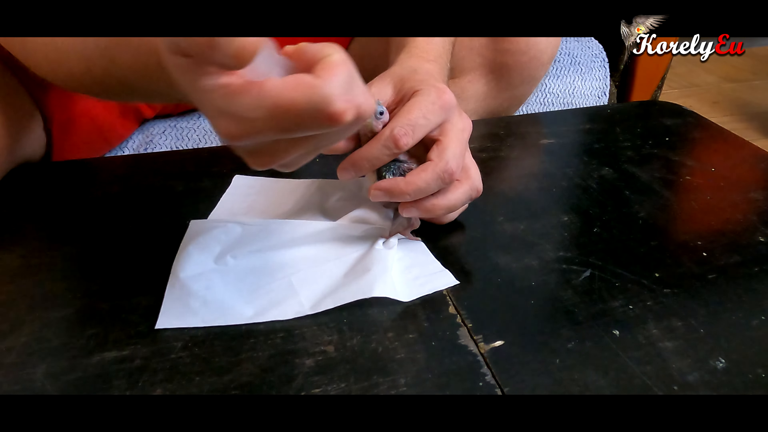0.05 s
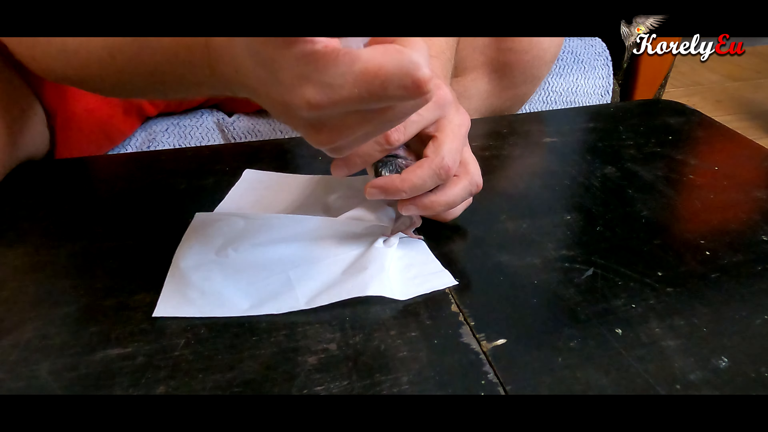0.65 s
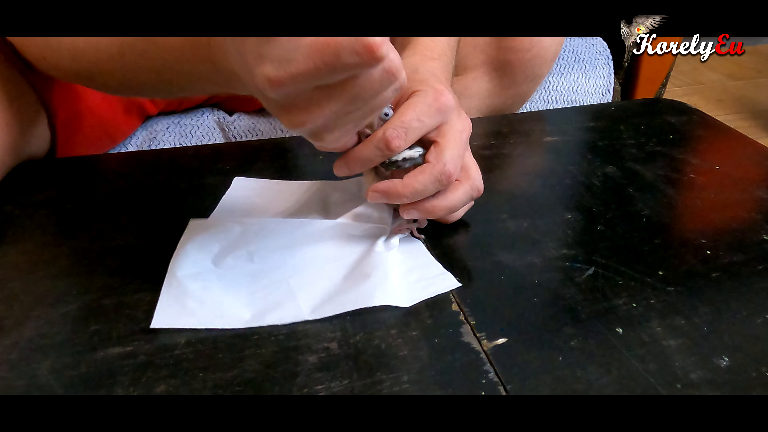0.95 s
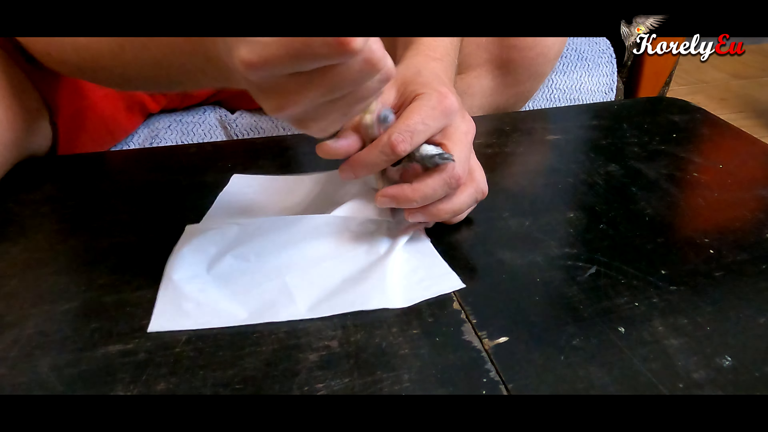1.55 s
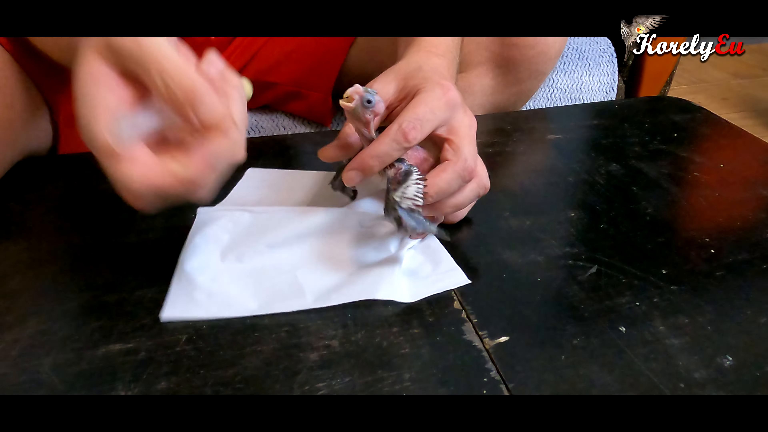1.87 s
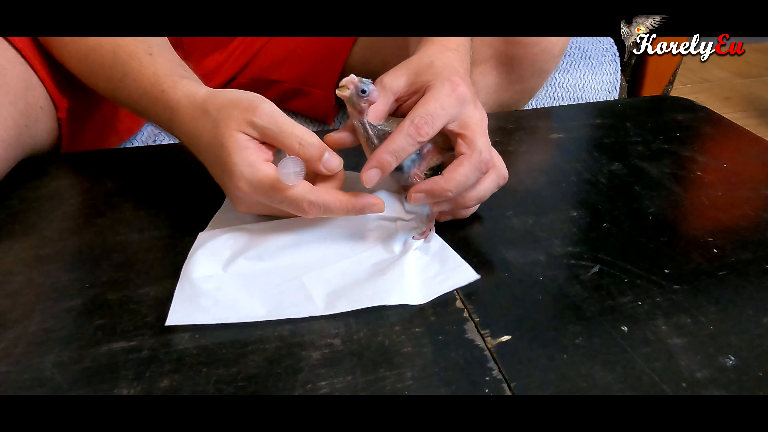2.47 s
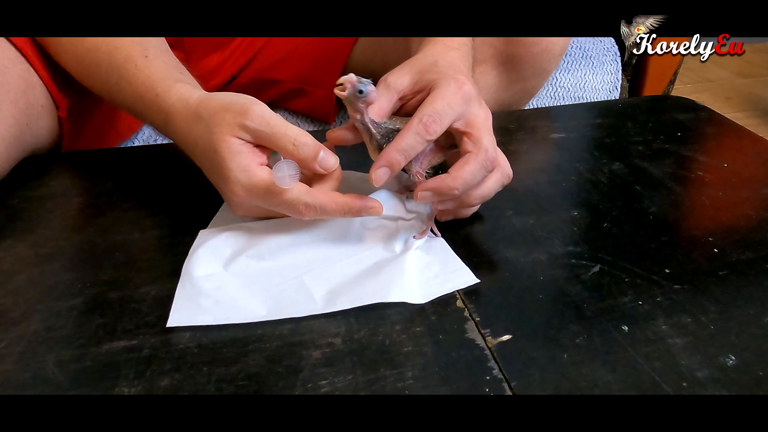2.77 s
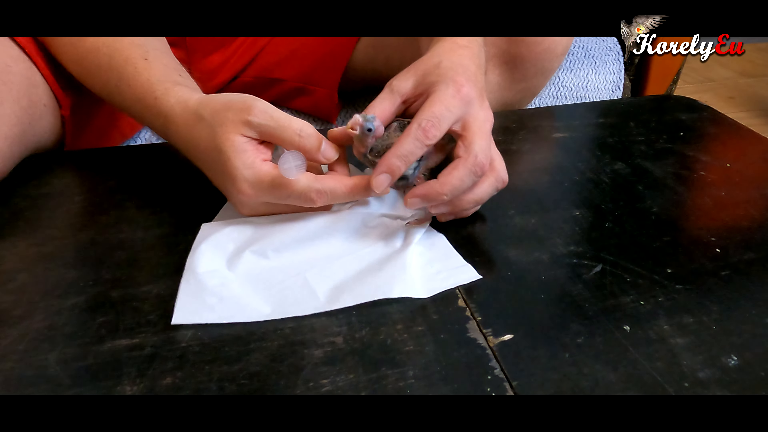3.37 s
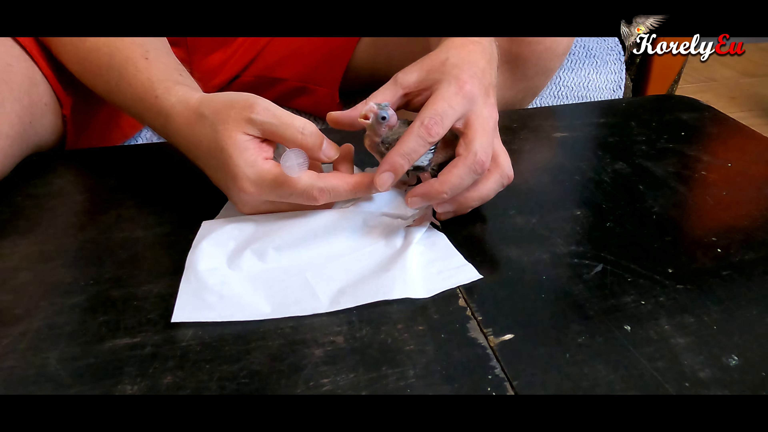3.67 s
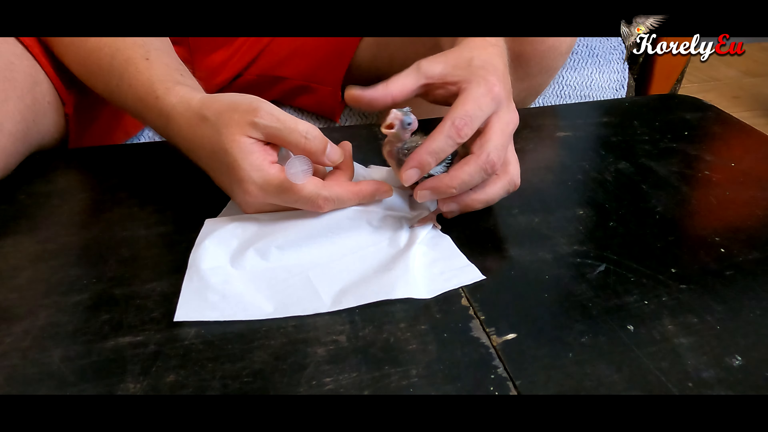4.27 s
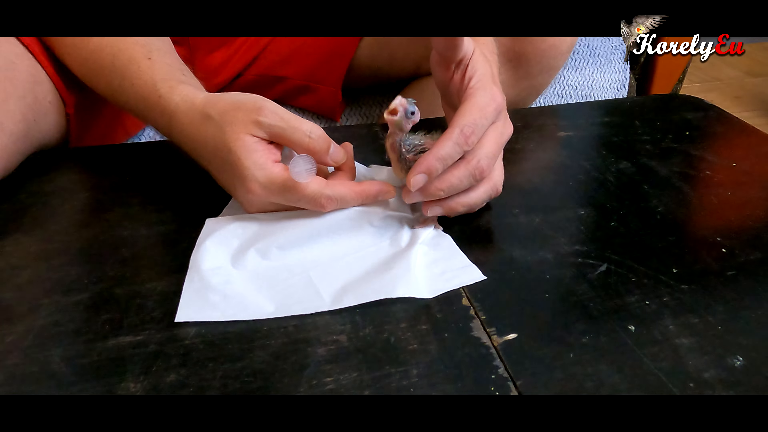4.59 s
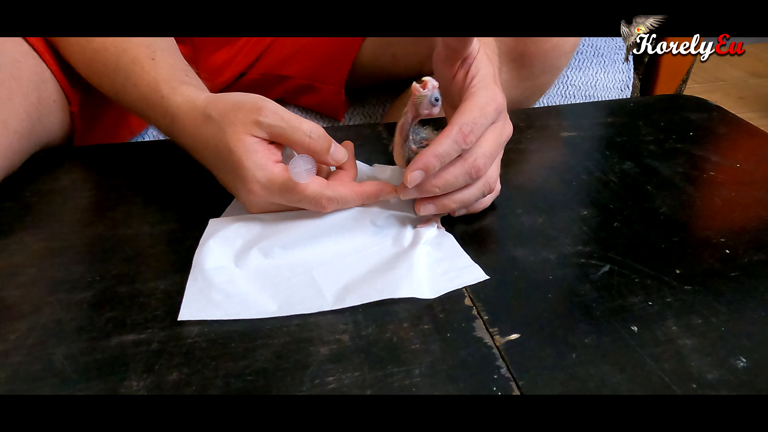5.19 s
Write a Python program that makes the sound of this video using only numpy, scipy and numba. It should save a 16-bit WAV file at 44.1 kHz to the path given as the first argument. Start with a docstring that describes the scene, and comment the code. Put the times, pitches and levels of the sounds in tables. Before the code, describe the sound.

Harsh, hissing begging calls from a close chick and its nest mates, with swallowing peeps and light table knocks in a small room.

```python
"""A cockatiel chick begs close to the microphone, hand-fed on a wooden table in a small room.
Each call is a long rasping hiss through the throat, with narrow squeals that glide as the beak moves;
the chick peeps as it swallows. Its nest mates beg further off to the left.
Hands thump the table, the syringe ticks and a paper towel rustles.
Behind it all lie a low room tone and the hum of a far motor."""
import sys
import numpy as np
from scipy import signal
from scipy.fft import rfft, irfft
from scipy.io import wavfile
from scipy.ndimage import uniform_filter1d, map_coordinates
from numba import njit

SR = 44100
rng = np.random.default_rng(int(sys.argv[2]) if len(sys.argv) > 2 else 0)


def generate_wav(sig):
    """Save sig (samples, or channels by samples) to the path in sys.argv[1] as 16-bit PCM at SR."""
    pcm = np.round(np.clip(np.atleast_2d(sig).T, -1, 1) * 32767).astype(np.int16)
    wavfile.write(sys.argv[1], SR, pcm)


N = 240049
T = np.arange(N) / SR

# Begging calls, close and off left. The swell starts swell_db below the full level.
# start_s, end_s, full_db, swell_db, swell_s, first_brightness_db, last_brightness_db, then
# opening_squeal_db for the chick or closing_flick_db for its nest mates
CHICK_CALLS = [ (-.13, 0.663, -27.5, 9, 0.25, 2.5, -2, -27.5), (0.66, 0.82, -32.5, -8, 0.091, 0, -1.5, -39),
               (3.167, 3.241, -41, 5.5, 0.093, 14, 3, -37), (4.113, 4.698, -27.5, 13.5, .11, 1.5, -2, -29),
               (4.864, 5.454, -30, 9, 0.15, 3, -1, -32.5)]
NEST_CALLS = [ (0.554, 1.539, -28.5, 4.5, 0.53, 5.5, 2, -38),
              (1.818, 3.183, -28.5, 11.5, 0.19, -5.5, 0.9, -39),
              (2.115, 2.755, -28.5, 15, 0.064, -13, -1, -34), (3.704, 4.604, -27, 9.5, 0.97, 0, 6.5, -33),
              (4.56, 5.333, -30.5, -2, 0.53, -1.5, 3.5, -57)]
# Throat and beak shapes, each held through a call: frequency_hz, gain_db
CHICK_THROAT_1 = [(290, -46), (500, -34), (720, -21.5), (930, -13), (1300, -17), (1830, -9), (2050, -16),
                  (2330, -8), (3560, -5), (4110, 0.5), (4870, -1), (5860, -6), (7360, -6), (8020, -16),
                  (9650, -23.5), (15000, -41)]
CHICK_THROAT_2 = [(290, -69), (500, -40.5), (720, -24.5), (949, -14.5), (1240, -26), (1500, -11.5),
                  (1700, -17.5), (3000, -12), (3270, -6), (4410, -8.5), (5620, -5), (6390, -11), (7790, -4),
                  (9380, -31), (13000, -32.5), (15000, -62)]
CHICK_THROAT_3 = [(290, -59.5), (500, -31.5), (962, -14.5), (1230, -20), (1500, -8.5), (1700, -10.5),
                  (2960, -8), (3270, -7.5), (4540, -6), (5090, 1), (6670, -1), (7910, -12), (8490, -15),
                  (12300, -27.5), (15000, -45)]
NEST_THROAT_1 = [(410, -67), (700, -42), (1250, -28.5), (1830, -15), (2340, -18.5), (2620, -10.5),
                 (3020, -8.5), (3400, 0.5), (3850, -6.5), (6100, -11.5), (6700, -23.5), (8000, -18),
                 (9100, -30), (11600, -35), (15000, -56.5)]
NEST_THROAT_2 = [(410, -58), (700, -42), (1260, -29.5), (1780, -14.5), (2250, -15.5), (2660, -7),
                 (2980, -7), (3350, 1.5), (3760, -3.5), (5590, -5.5), (6350, -11.5), (7900, -15.5),
                 (8980, -22), (12500, -34.5), (15000, -50)]
NEST_THROAT_3 = [(900, -38.5), (1500, -30), (2000, -8.5), (2400, -15), (2800, -6.5), (3250, 4), (3700, -3),
                 (4500, -15), (5500, -15.5), (8000, -51), (14000, -65)]
NEST_THROAT_4 = [(410, -42), (700, -36.5), (1150, -26.5), (1470, -30), (1670, -16.5), (2460, -22),
                 (3260, 1), (3850, -6), (4440, -9.5), (5520, -13.5), (6190, -8), (7800, -13), (8870, -22.5),
                 (13900, -50), (15000, -69)]
NEST_THROAT_5 = [(410, -73), (700, -52), (916, -47), (1020, -33), (1380, -25), (1740, -15.5), (1950, -13),
                 (2250, -22.5), (3300, 2.5), (3850, -4), (4920, -6.5), (7800, -5), (8980, -24.5),
                 (13700, -40), (15000, -69)]
# Peaks and hollows shared by all of a bird's calls: centre_hz, width_hz, gain_db
CHICK_RESONANCES = [(1000, 490, 3.5), (1565, 104, 4), (2060, 260, 2), (3110, 210, -3), (3210, 270, 3),
                    (3570, 210, -2.5), (4050, 390, -1), (4836, 78, 9.5), (5550, 220, -0.5),
                    (5930, 145, -15.5), (7570, 700, 1.5), (9440, 780, 7.5)]
NEST_RESONANCES = [(1973, 100, 0.5), (2368, 340, 2), (3010, 220, -5.5), (3330, 350, -0.5),
                   (3730, 290, -7.5), (3900, 250, 2.5), (4524, 1240, -6), (5045, 190, 6), (5280, 110, 0.5),
                   (5620, 120, 4), (7730, 58, 12), (9000, 650, -3)]
# How each position reaches the microphone pair: frequency_hz, left_minus_right_db
CHICK_BALANCE = [(800, 0.5), (2300, 1.5), (3300, -2), (4700, 3.5), (6800, -4.5), (8400, 2), (14000, -3)]
NEST_BALANCE = [(800, 1), (1800, 7), (2700, 10), (3600, 6.5), (4600, 3.5), (5700, 2.5), (7400, 9.5),
                (8500, 4), (10500, 7.5), (14000, 1)]
# The nest mates' throats tighten and slacken, moving their resonances: time_s, main_resonance_hz
NEST_TUNING = [(0.6, 3276), (0.8, 3386), (0.92, 3475), (1.02, 3338), (1.17, 3450), (1.5, 3393), (1.9, 3276),
               (2.15, 3334), (2.42, 3299), (2.76, 3277), (2.85, 3338), (3.18, 3320), (3.8, 3257),
               (4.15, 3317), (4.52, 3384), (4.8, 3356), (5.1, 3307), (5.35, 3360)]
# Squeals of a straining bird:
# start_s, length_s, start_hz, end_hz, bow_hz, width_hz, level_db, left_minus_right_db
SQUEALS = [ (0.43, 0.26, 6420, 6560, 0, 430, -33.5, 0), (0.67, 0.135, 6480, 6520, 230, 580, -27.5, -2.5),
           (0.791, 0.046, 6450, 6350, 0, 300, -31.5, -1), (0.8, 0.45, 3470, 3480, -50, 250, -37, 7),
           (1.086, 0.47, 6000, 5570, 120, 450, -38.5, 4), (2.217, 0.58, 1920, 1960, 132, 260, -39, 3),
           (3.706, 0.08, 2860, 3070, -2, 902, -58, 8), (3.785, 0.0609, 6700, 4640, 150, 1020, -33, 0.5),
           (4.21, 0.17, 2350, 2550, -170, 520, -33.5, 7), (4.213, 0.088, 5080, 5600, 0, 200, -35, -1),
           (4.273, 0.24, 7840, 8100, 450, 750, -38.5, -1), (4.28, 0.39, 5550, 5560, 110, 140, -29.5, -1),
           (4.4, 0.16, 2780, 2940, -8, 447.4, -36, 15), (4.423, 0.27, 10900, 10200, 0, 1500, -46, 1),
           (4.543, 0.14, 7744, 7170, 0, 400, -31.5, -3), (5.168, 0.168, 6620, 6700, 0, 450, -35.5, -3),
           (5.322, 0.12, 6700, 6394, 80, 401, -30, -1)]
# Swallowing peeps, a falling high note that breaks into a low one:
# break_s, high_length_s, high_start_hz, high_db, low_length_s, low_start_hz, low_db
PEEPS = [ (0.8945, 0.021, 10000, -15, 0.0096, 4300, -26), (1.0646, 0.0063, 8530, -8, 0.0076, 4970, -13.5),
         (1.244, 0.012, 9000, -22.5, 0.0055, 4850, -22.5), (1.4213, .006, 8660, -26, 0.0061, 4910, -16.5),
         (1.5873, .004, 8600, -63, 0.0055, 4510, -22.5)]
# Clean squeaks within or at the edge of a call:
# start_s, length_s, start_hz, end_hz, level_db, left_minus_right_db
SQUEAKS = [(1.819, 0.0076, 2420, 2930, -40.5, 14), (3.2425, .011, 5110, 4780, -29, 1),
           (4.335, 0.021, 2530, 2550, -25, 16), (4.366, 0.023, 2727, 2858, -20, 14),
           (4.69, 0.0056, 3530, 4193, -20, 0)]
# Hands knocking on the table: start_s, level_db, brightness_db_per_octave
KNOCKS = [(1.028, -45.5, -16), (1.213, -34, -17), (1.405, -25, -1), (1.523, -34.5, 3.5),
          (1.571, -13.5, 3.5), (1.59, -23, 6.5), (1.714, -29.5, -2.5), (4.615, -37, -14)]
# Modes of the table top: pitch_hz, level_db, t60_s
TABLE_MODES = [(164, -26, 0.034), (221.5, 5, 0.034), (279, 2.5, 0.1), (315, -3.5, 0.088), (403, -18, 0.052),
               (506.3, -5.5, 0.065), (707, -14.5, 0.056), (980, -6, 0.04), (1048, -20, 0.042)]
# Weight shifting on the table, and ticks of syringe and beak: start_s, peak_db
BUMPS = [(1.405, -57.5), (1.573, -44), (2.521, -55.5), (4.56, -53)]
TICKS = [(1.607, -35), (1.673, -31), (1.693, -33), (1.731, -40), (1.749, -55), (1.764, -47), (3.553, -44)]
# Fingers on the paper towel, one curve a rustle: time_s, level_db
RUSTLES = [
    [(1.6, -57), (1.66, -55), (1.71, -55), (1.735, -46.5), (1.76, -49), (1.8, -60.5), (1.84, -48),
     (1.88, -60)],
    [(3.4, -86.5), (3.445, -74), (3.478, -55), (3.505, -53.5), (3.525, -64), (3.58, -84), (3.62, -80)],
]
# Spectra of flesh on wood, deep bumps, ticks, paper and room tone: frequency_hz, gain_db
THUD_SPECTRUM = [(100, -34), (170, 6), (380, 3.5), (600, -14.5), (1500, -24), (4000, -60.5)]
BUMP_SPECTRUM = [(35, -11), (55, 6), (95, 6.5), (130, -28), (250, -43.5), (1000, -80)]
TICK_SPECTRUM = [(470, -34), (800, -19), (2570, -7), (2790, -5), (3400, -8), (5040, -9), (12500, -23),
                 (15000, -45)]
PAPER_SPECTRUM = [(350, -39), (600, -27), (1790, -7), (3500, -13.5), (5840, -13.5), (8410, -25.5),
                  (11200, -27), (13800, -34.5), (15000, -53)]
ROOM_TONE_SPECTRUM = [(15, -49), (25, -14), (86, -25), (142, -5), (186, 2), (219, -1), (250, -5.5),
                      (286, -6.5), (383, -7), (427, -16.5), (558, -23), (1090, -24.5), (3830, -42.5),
                      (5140, -36.5), (15000, -65.5)]
# A far motor: pitch_hz, level_db
MOTOR_HUM = [(198, -66.5), (394, -70)]

CHICK_ATTACK_S, CHICK_RELEASE_S = 0.03, 0.023


def held_chick():
    """Close to the microphone, dry and harsh: rasping air shaped by throat and beak."""
    throats = [CHICK_THROAT_1, CHICK_THROAT_1, CHICK_THROAT_3, CHICK_THROAT_2, CHICK_THROAT_3]
    air = rasp(flap_hz=400, roughness=0.5, scatter_db=1.2)
    calls = sum(beg(call, unit(colour(air, throat)), CHICK_ATTACK_S, CHICK_RELEASE_S)
                for call, throat in zip(CHICK_CALLS, throats))
    voice = resonances(calls, CHICK_RESONANCES)
    return microphone_pair(room(voice, near_db=-4, tail_db=-12.5), CHICK_BALANCE)


def rasp(flap_hz, roughness, scatter_db):
    """Noise in uneven puffs, as when a syrinx flaps and lets out turbulent air."""
    gap_draw, size_draw = rng.standard_normal((N // 20, 2)).T
    starts = np.cumsum(np.exp(0.45 * gap_draw)) / flap_hz
    phase = np.interp(T, starts, np.arange(len(starts)))
    puffs = undb(scatter_db * size_draw[phase.astype(int)]) * np.exp(-2 * (phase % 1))
    return unit(rng.standard_normal(N) * (1 - roughness + roughness * unit(puffs)))


def beg(call, voice, attack_s, release_s):
    """One call opens, moves towards its full level and is cut off; brightness follows the beak."""
    start, end, full_db, swell_db, swell_s, first_db, last_db, _ = call
    low = lowpass(voice, 2600)
    tilt = undb(np.interp(T, [start, end], [first_db, last_db]) / 2)
    age = np.maximum(T - start, 0)
    gate = np.minimum(age / attack_s, 1) * np.clip(1 - (T - end) / release_s, 0, 1)
    gain = gate ** 2 * undb(full_db - swell_db * np.exp(-age / swell_s))
    return (low / tilt + (voice - low) * tilt) * gain


def squeals(opening_s=0.204, climb_s=0.024, fade_db_per_s=27, build_db=2.5):
    """A climbing squeal opens each of the chick's calls; others bow in pitch and build with strain."""
    out = np.zeros((2, N))
    air = rasp(flap_hz=298.6, roughness=0.3, scatter_db=3)
    from_hz, to_hz = 3460, 4940
    for start, end, *_, db in CHICK_CALLS:
        age = T[:int(min(opening_s, end + CHICK_RELEASE_S / 2 - start) * SR)]
        hz = to_hz + (from_hz - to_hz) * np.exp(-age / climb_s)
        fading_db = db - fade_db_per_s * age
        add(out, start, squeal(air, start, hz, width_hz=600, db=fading_db, pan_db=2, taper=0.062))
    for start, length, start_hz, end_hz, bow_hz, width_hz, db, pan_db in SQUEALS:
        progress = np.linspace(0, 1, int(length * SR))
        hz = start_hz + (end_hz - start_hz) * progress + bow_hz * np.sin(np.pi * progress)
        add(out, start, squeal(air, start, hz, width_hz, db + build_db * (progress - 0.5), pan_db))
    return room(out, near_db=-7, tail_db=-6)


def squeal(air, start, hz, width_hz, db, pan_db, taper=0.14, whistle_width_hz=115):
    """The rasp rings a narrow resonance that glides with the beak and half sustains as a whistle."""
    ring = np.roll(air, -int(start * SR))[:len(hz)]
    hz = hz * (1 + 0.004 * tremble(below_hz=34.5)[:len(hz)])
    for _ in range(2):
        ring = gliding_bandpass(ring, hz, 1.38 * width_hz)
    swing = np.abs(signal.hilbert(unit(ring))) + 0.05
    saturation = min(whistle_width_hz / width_hz, 1)  # narrower rings hold a steadier level
    whistle = unit(ring / swing ** saturation)
    return whistle * signal.windows.tukey(len(hz), taper) * undb(db) * pan(undb([pan_db]))


def peeps(break_hz=6050, overlap_s=0.0015, low_fall=0.24, slap_s=0.0035, slap_db=-11):
    """Two-note swallowing peeps, squeaks and closing flicks, with a slap back from the table."""
    out = np.zeros((2, N))
    for break_s, high_s, high_hz, high_db, low_s, low_hz, low_db in PEEPS:
        high = note(high_s + overlap_s, high_hz, break_hz, high_db, rise_db=20, bend=2.1, taper=0.15)
        add(out, break_s - high_s, high)
        add(out, break_s, note(low_s, low_hz, low_hz * (1 - low_fall), low_db))
    for start, *squeak in SQUEAKS:
        add(out, start, note(*squeak))
    for _, end, *_, db in NEST_CALLS:  # the pitch flicks down as a nest mate's beak shuts
        flick = note(0.022, start_hz=3500, end_hz=1883, db=db, pan_db=7, bend=0.95, taper=0.082)
        add(out, end, flick)
    add(out, slap_s, out * undb(slap_db))
    return room(out, near_db=-11, tail_db=-10)


def note(length_s, start_hz, end_hz, db, pan_db=0.5, rise_db=0, bend=1.15, taper=0.48, overtone_db=-34):
    """A near-pure gliding note; with bend above one the glide gathers speed."""
    progress = np.linspace(0, 1, int(length_s * SR))
    phase = 2 * np.pi * np.cumsum(start_hz + (end_hz - start_hz) * progress ** bend) / SR
    tone = unit(np.sin(phase) + undb(overtone_db) * np.sin(2 * phase))
    gain = signal.windows.tukey(len(tone), taper) * undb(db + rise_db * (progress ** 2 - 1))
    return tone * gain * pan(undb([pan_db]))


def nest_mates(relaxed_hz=3322):
    """Further off to the left, their rasp smoothed by the room; each throat bends and trembles."""
    throats = [NEST_THROAT_1, NEST_THROAT_2, NEST_THROAT_3, NEST_THROAT_4, NEST_THROAT_5]
    tension = np.interp(T, *np.transpose(NEST_TUNING)) / relaxed_hz
    calls = np.zeros(N)
    for call, throat in zip(NEST_CALLS, throats):
        air = rasp(flap_hz=600, roughness=0.1, scatter_db=1)
        steady = unit(colour(air, throat))
        speed = tension + 0.014 * tremble(below_hz=9)  # shifts the whole throat spectrum
        wavering = map_coordinates(steady, [np.cumsum(speed)], order=3, mode="mirror")
        calls += beg(call, wavering, attack_s=0.093, release_s=0.034)
    voices = resonances(calls, NEST_RESONANCES)
    return microphone_pair(room(voices, near_db=-5, tail_db=-6.5), NEST_BALANCE)


def table_knocks(push_s=0.0019, thud_db=-4, thud_t60_s=0.24):
    """Soft pushes of the hands ring the table top over a dull thud."""
    out, t = np.zeros(N), T[:SR // 3]
    for start, db, db_per_octave in KNOCKS:
        ring = np.zeros(len(t))
        for hz, mode_db, t60_s in TABLE_MODES:
            octaves = max(np.log2(hz / 285), 0)  # the contact shapes only the upper modes
            ring += undb(mode_db + db_per_octave * octaves - 60 * t / t60_s) * np.sin(2 * np.pi * hz * t)
        thud = unit(colour(rng.standard_normal(len(t)), THUD_SPECTRUM))
        knock = (ring + thud * undb(thud_db - 60 * t / thud_t60_s)) * (1 - np.exp(-t / push_s))
        add(out, start, with_peak(knock, db))
    out -= lowpass(out, 140)  # low cut at 140 Hz keeps the knocks light, with little deep bass
    return room(out, near_db=-14, tail_db=-10)


def table_bumps():
    """The whole table shudders briefly under the arms."""
    out, t = np.zeros(N), T[:SR // 2]
    for start, db in BUMPS:
        rumble = colour(rng.standard_normal(len(t)), BUMP_SPECTRUM)
        add(out, start, with_peak(rumble * strike(t, rise_s=0.006, t60_s=0.4), db))
    return out


def syringe_and_towel():
    """The plastic syringe and the beak tick; the paper towel crinkles under the fingers."""
    out, t = np.zeros(N), T[:SR // 20]
    for start, db in TICKS:
        burst = rng.standard_normal(len(t)) * strike(t, rise_s=0.001, t60_s=0.014)
        add(out, start, with_peak(colour(burst, TICK_SPECTRUM), db))
    paper = unit(colour(rasp(flap_hz=235.6, roughness=0.4, scatter_db=3), PAPER_SPECTRUM))
    for curve in RUSTLES:
        level_db = np.interp(T, *np.transpose(curve), left=-120, right=-120)
        out += paper * uniform_filter1d(undb(level_db), size=256)
    return room(out, near_db=-4, tail_db=-13)


def room(dry, near_db, tail_db, near_t60_s=0.036, bass_t60_s=0.26, treble_t60_s=0.24):
    """Direct sound, quick reflections off table and hands, and the small room's diffuse tail."""
    t = T[:SR // 2]
    noise = rng.standard_normal((3, len(t)))
    common, separate = noise[0], noise[1:]
    bass = lowpass(common, 740)  # long waves reach both microphones alike
    treble = 0.45 * (common - bass) + 0.71 * (separate - lowpass(separate, 690))
    near = (bass + treble) * undb(-60 * t / near_t60_s) * (t > 0.001)
    tail = (bass * undb(-60 * t / bass_t60_s) + treble * undb(-60 * t / treble_t60_s)) * (t > 0.012)
    response = (unit(near) * undb(near_db) + unit(tail) * undb(tail_db)) / np.sqrt(len(t))
    direct = dry * np.ones((2, 1))
    echoes = signal.fftconvolve(direct, response, axes=1)[:, :N]
    return (direct + echoes) / np.sqrt(1 + undb(2 * near_db) + undb(2 * tail_db))


def room_tone(rush_db=-56.5):
    """A low steady rush, wider in the treble, with the faint hum of a far motor."""
    mid, side = colour(rng.standard_normal((2, N)), ROOM_TONE_SPECTRUM)
    side = 1.05 * (side - 0.47 * lowpass(side, 900))
    hum = sum(undb(db) * unit(np.sin(2 * np.pi * hz * T)) for hz, db in MOTOR_HUM)
    return unit(np.array([mid + side, mid - side])) * undb(rush_db) + hum


def microphone_pair(x, balance):
    """The pair shades each direction differently with frequency."""
    return irfft(rfft(x) * pan(bin_gains(balance, N)), N)


def pan(ratio):
    """Left and right gains for a left / right ratio."""
    return np.vstack([2 * ratio, np.full_like(ratio, 2)]) / (1 + ratio)


def resonances(x, peaks):
    """Bell-shaped boosts and cuts."""
    bin_hz = np.fft.rfftfreq(N, 1 / SR)
    gain_db = sum(db * np.exp2(-(2 * (bin_hz - hz) / width) ** 2) for hz, width, db in peaks)
    return irfft(rfft(x) * undb(gain_db), N)


@njit
def gliding_bandpass(x, hz, width_hz):
    """State-variable band-pass whose centre moves."""
    y, band_state, low_state = np.empty(len(x)), 0., 0.
    for i in range(len(x)):
        step, damping = np.tan(np.pi * hz[i] / SR), width_hz / hz[i]
        band = (band_state + step * (x[i] - low_state)) / (1 + step * (step + damping))
        band_state = 2 * band - band_state
        low_state += 2 * step * band
        y[i] = damping * band
    return y


def bin_gains(points, size):
    """Gain at each FFT bin from frequency_hz, gain_db points."""
    hz, db = np.transpose(points)
    return undb(np.interp(np.log(np.fft.rfftfreq(size, 1 / SR) + 1), np.log(hz), db))


def colour(x, points):
    """Filter by a spectrum that falls away below its first point."""
    size = x.shape[-1]
    skirt = np.minimum(np.fft.rfftfreq(size, 1 / SR) / points[0][0], 1) ** 2
    return irfft(rfft(x) * bin_gains(points, size) * skirt, size)


def lowpass(x, hz):
    """The part of x below hz, with no delay."""
    return signal.sosfiltfilt(signal.butter(2, hz, fs=SR, output="sos"), x)


def tremble(below_hz):
    """A slow random sway with an rms of one."""
    return unit(lowpass(rng.standard_normal(N + 2 * SR), below_hz)[SR:-SR])


def strike(t, rise_s, t60_s):
    """A quick rise and an exponential decay."""
    return (1 - np.exp(-t / rise_s)) * undb(-60 * t / t60_s)


def add(out, start_s, x):
    """Mix x in at start_s."""
    offset = int(start_s * SR)
    first, last = max(offset, 0), min(offset + x.shape[-1], N)
    out[..., first:last] += x[..., first - offset:last - offset]


def undb(db):
    """Decibels to gain."""
    return 10 ** (np.asarray(db) / 20)


def unit(x):
    """Scale to an rms of one."""
    return x / np.sqrt(np.mean(x ** 2) + 1e-20)


def with_peak(x, db):
    """Scale to a peak level."""
    return x / np.abs(x).max() * undb(db)


def scene():
    """Birds, feeding and room as heard from the table."""
    microphone_hiss = undb(-78) * rng.standard_normal((2, N))
    birds = held_chick() + nest_mates() + squeals() + peeps()
    feeding = table_knocks() + table_bumps() + syringe_and_towel()
    return birds + feeding + room_tone() + microphone_hiss


def record(dry):
    """The camera cuts the treble steeply above 14.8 kHz."""
    return signal.sosfilt(signal.ellip(8, 0.2, 80, 14800, fs=SR, output="sos"), dry)


dry = scene()
out = record(dry)
generate_wav(out)
```